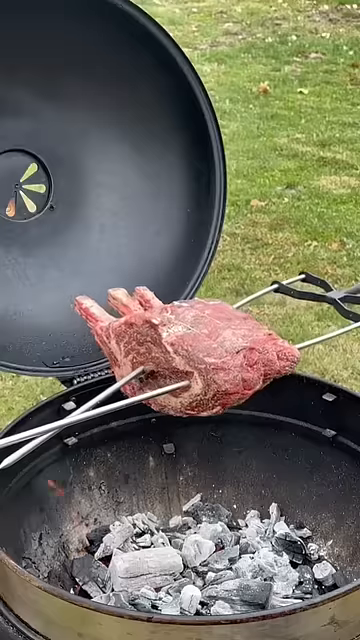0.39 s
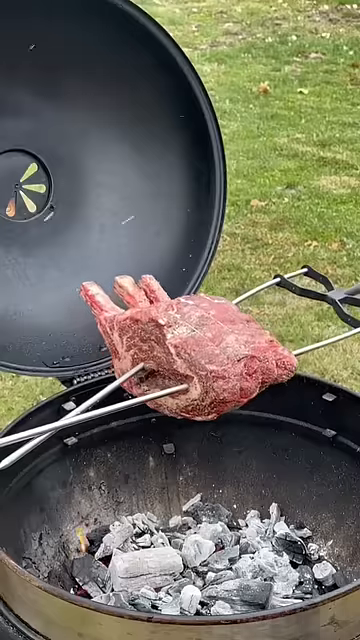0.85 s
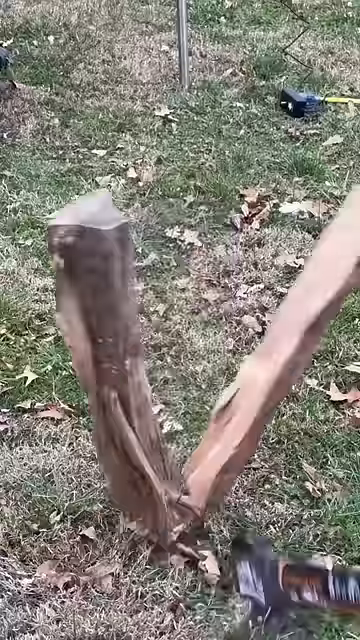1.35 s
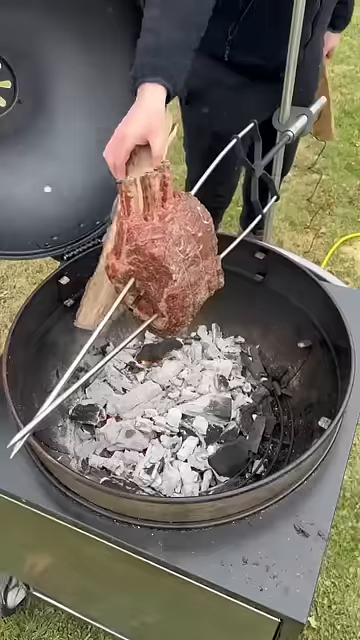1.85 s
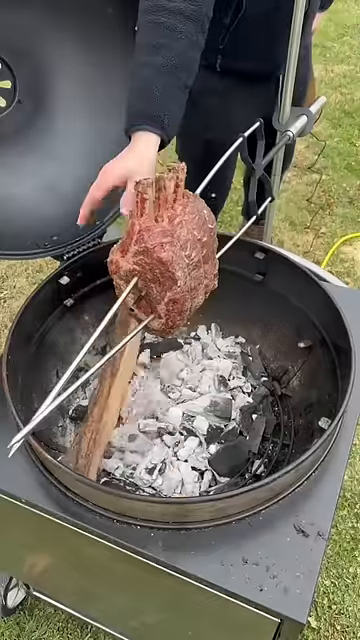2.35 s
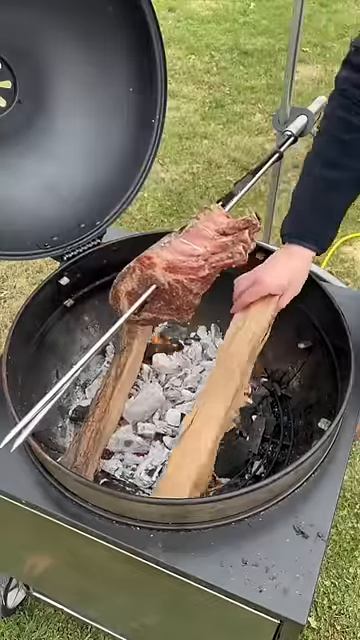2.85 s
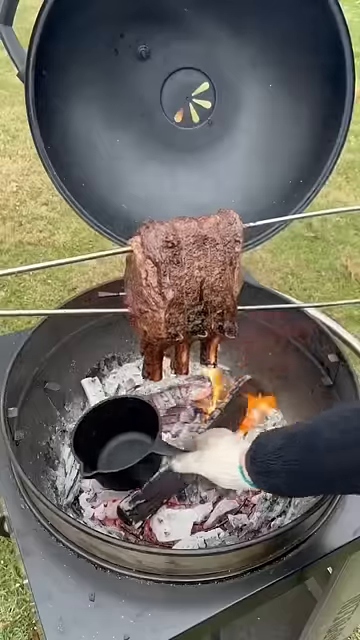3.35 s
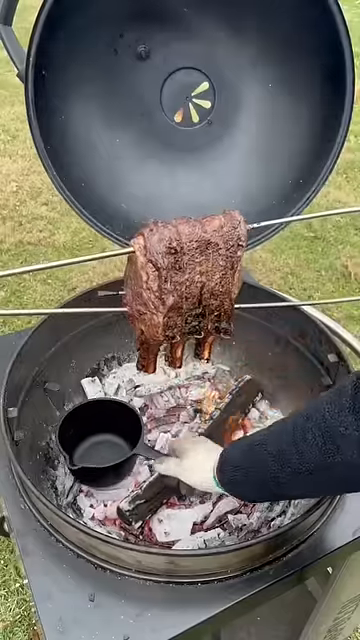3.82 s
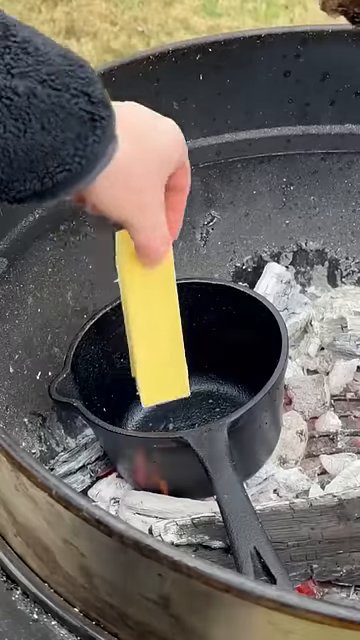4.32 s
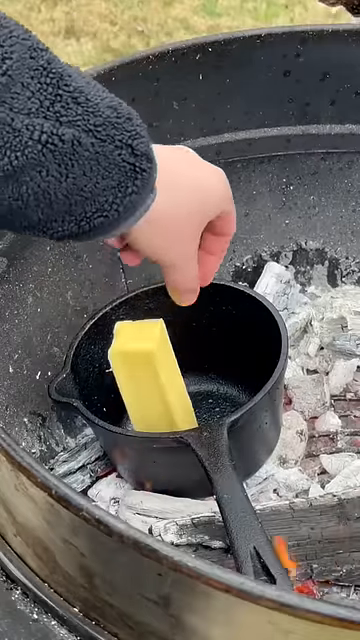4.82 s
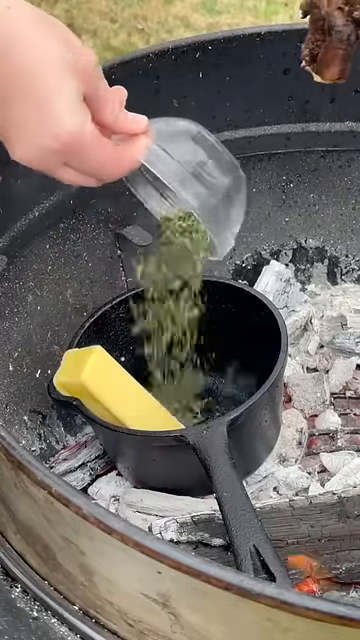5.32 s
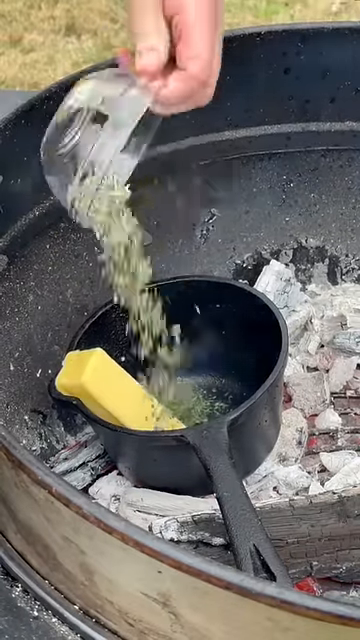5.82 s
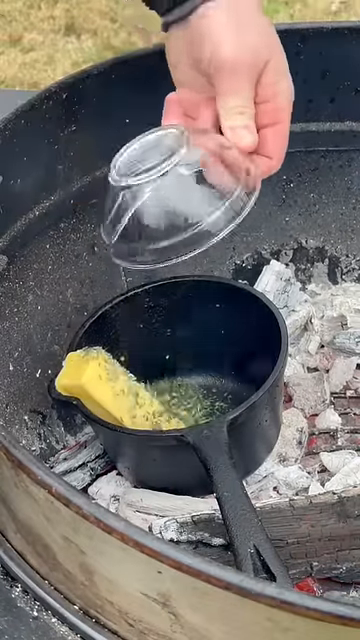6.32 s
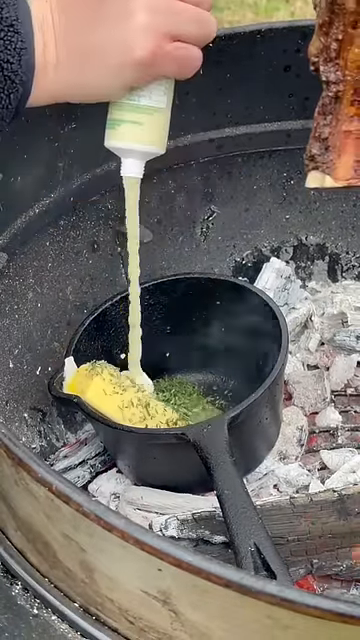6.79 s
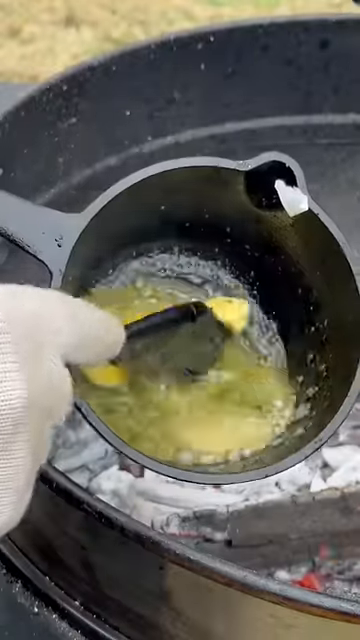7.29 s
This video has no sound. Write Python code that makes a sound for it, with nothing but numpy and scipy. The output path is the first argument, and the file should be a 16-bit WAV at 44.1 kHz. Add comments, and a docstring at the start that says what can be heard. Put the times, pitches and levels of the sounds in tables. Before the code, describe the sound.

A close, dry outdoor phone pickup with low wind and soft yard noise, in abruptly cut scenes. From 0.1 to 1.0 s a faint, narrow, noisy motor whine runs, with a crisp tick near 0.76. Fine leafy rustle follows; at 1.3 an axe splits wood with a very short, falling crack, and a small wood knock lands at 1.65. Muffled flame flutter begins at 1.8. At 2.25-2.35 a log thuds in rapid hollow knocks with crunching charcoal and brief squeaks; another hits at 2.79, then clatters brightly at 3.05. The motor whirs from 3.24 to 5.0, with a wind bump at 3.29. Iron scrapes in gritty, ringing jerks from 3.53 to 4.11, growing stronger. From 5.0 butter sizzles, with sharp pops clustering at 5.65 and 6.0-6.15, a low wind bump at 5.9, and more spits until 7.0. A quieter, fizzy sizzle closes by 7.4.

```python
"""Butter sizzles and spits in an iron pot: noise bursts stand for bubbles, sharp clicks for fat and embers.
Before it, in short outdoor scenes cut together around a charcoal kettle grill, a spit motor whines in narrow
noisy bands, an axe splits a log with a falling sweep, the halves thud on the grass and later logs thud on the
coals as ringing wood modes, and the pot scrapes into the charcoal as ringing grit. Shaped noise makes the wind,
yard, flames and rustle. A phone picks it all up through two ports that fall out of phase in the treble."""
import sys
import numpy as np
from scipy import signal
from scipy.fft import rfft, irfft, next_fast_len
from scipy.io import wavfile

SR = 44100
rng = np.random.default_rng(int(sys.argv[2]) if len(sys.argv) > 2 else 0)


def magnitude_from_level(level_db):
    """Linear magnitude for a level in decibels (20 dB per decade)."""
    exponent = np.asarray(level_db, float) / 20
    return 10 ** exponent


def to_wav(s):
    """Save 16-bit WAV."""
    ch = np.atleast_2d(s).T  # columns
    pcm = np.round(np.clip(ch, -1, 1) * 32767)  # PCM
    wavfile.write(sys.argv[1], SR, pcm.astype(np.int16))


N = 327222
TIME = np.arange(N) / SR  # seconds

# tone colour of each background noise: pitch_hz, gain_db
WIND_COLOUR = [(20, -9), (45, 1.5), (90, 1), (130, -4.5), (190, -12.5), (400, -48.5)]
YARD_COLOUR = [(120, -8), (200, 4.5), (300, 2), (600, -3), (900, -4), (1400, -11.5), (2400, -32),
               (5000, -52), (16000, -28)]
FLAME_COLOUR = [(100, -0.5), (200, -1), (400, 2), (560, -6.5), (700, -3.5), (1100, -15), (1500, -27.5),
                (2200, -40), (16000, -64)]
RUSTLE_COLOUR = [(2000, -36), (4000, -3.5), (6000, 0), (8500, 0.5), (11000, 1), (13500, -12), (15500, -2.5)]
# steady background, each row held until the next, -99 is as good as silent:
# start_s, wind_db, yard_db, flames_db, bright_hiss_db, dull_hiss_db
STRETCHES = [(0, -51.5, -61, -99, -99, -99), (.1, -49.5, -58, -99, -104, -65),
             (1, -50, -59, -99, -60.5, -64), (1.41, -61, -68, -99, -71, -64.5),
             (1.659, -53.5, -60.5, -99, -57, -62.5), (1.809, -57, -99, -47, -65, -66),
             (2.241, -53, -99, -38, -99, -99), (2.52, -43.5, -99, -42, -88.5, -81),
             (2.78, -45, -99, -37.5, -99, -99), (3.209, -41.5, -54, -99, -70, -64.5),
             (3.45, -51.5, -54.5, -99, -69, -66.5), (4.12, -44, -57, -99, -63, -64.5),
             (5, -53.5, -62, -99, -99, -99), (5.67, -45, -57, -99, -99, -99),
             (6.45, -48.5, -60.5, -99, -99, -99), (7.1, -47.5, -55.5, -99, -99, -99)]
GUSTS_PER_S, GUST_SPREAD_DB = 9, 4.5
# puffs of air on the ports, some pushed by the falling wood: peak_s, level_db, fall_s
PUFFS = [(1.04, -54, 0.076), (1.314, -42, 0.048), (1.658, -39, 0.033), (1.884, -34.5, 0.019),
         (2.03, -42, 0.021), (2.345, -32, 0.12), (2.79, -40, .06), (3.07, -42, 0.15), (2.65, -47, 0.045),
         (6.37, -49, 0.032)]
PUFF_RISE_S = 0.026
# gusts that knock the microphone: start_s, level_db, pitch_hz
KNOCKS = [(3.287, -27.5, 105), (5.903, -24.5, 73.6)]
# leaves and embers swelling up: peak_s, rise_s, fall_s, bright_db, dull_db
SWELLS = [(.62, 0.23, 0.093, -52, -59), (1.09, 0.086, 0.005, -46.5, -55.5), (2.07, 0.3, 0.097, -65, -62)]

# gear whine of the spit motor: start_s, end_s, level_db
WHINE = [(0.102, 1.002, -60), (2.513, 2.78, -71), (3.242, 4.118, -58), (4.097, 5.013, -60.5)]
# bands of each whine, one list per row above: pitch_hz, width_hz, relative_level_db
WHINE_BANDS = [
    [(3350, 100, 7), (3630, 82, 6), (4800, 100, -8), (5460, 130, -20), (6400, 160, 0), (7750, 130, -1),
     (9390, 110, -20)],
    [(3900, 150, -1), (4800, 200, 3), (6500, 200, 3), (7900, 150, -8.5)],
    [(3460, 66, -10), (4310, 38, -4.5), (6010, 180, -9), (7560, 260, 6.5), (8440, 72, -6), (9000, 110, -17)],
    [(2600, 160, 8), (4910, 62, -9), (6940, 31, 2.5), (7550, 75, 8.5), (7840, 72, -4), (8600, 180, -19),
     (9000, 31, -13)],
]
# brief noisy tones as wood splits and rubs, and one in the fat: start_s, length_s, pitch_hz, level_db
SQUEAKS = [(1.311, 0.043, 980, -34), (1.312, .02, 2200, -38), (1.346, 0.06, 1980, -45),
           (1.397, 0.12, 2000, -59), (1.867, 0.28, 2090, -56), (2.392, 0.091, 1600, -38),
           (2.457, 0.07, 1446, -36), (2.787, 0.041, 2900, -40), (2.817, 0.087, 1480, -38),
           (3.042, 0.026, 2750, -23), (3.076, 0.025, 3580, -27.5), (3.098, 0.049, 2990, -29),
           (3.138, .083, 1500, -34), (5.536, 0.021, 1810, -37.5)]
SQUEAK_WIDTH_HZ = 180

# the iron pot jerks forward through the coals: start_s, level_db
DRAG = [(3.534, -57.5), (3.591, -53.5), (3.695, -49.5), (3.733, -50), (3.79, -66), (3.861, -48.5),
        (3.897, -47.5), (3.973, -44.5), (4.039, -43), (4.079, -49.5)]
DRAG_END_S, SLIP_FADE_S = 4.113, 0.062  # the pot is let go at the end
# tone colour of the scraping: pitch_hz, gain_db
DRAG_COLOUR = [(150, -3), (300, 2.5), (600, -5), (1200, -2.5), (2400, -12), (4000, -11), (6000, -19.5),
               (8500, -15), (11000, -15), (13500, -27), (15500, -18)]
# resonances of the pot wall: pitch_hz, width_hz, relative_level_db
POT_MODES = [(588, 35, -1.5), (1537, 52, -3.5), (1950, 62, -2.5), (2190, 24, 1), (2650, 42, -7),
             (4040, 42, -6), (4440, 36, -14), (5180, 35, 2), (6180, 72, -1), (6630, 42, 0),
             (7360, 200, -33)]

# charcoal and splinters cracking under a log: peak_s, level_db, fade_s, dust_db (bright dust against the crack)
CRUNCH = [(1.298, -39, 0.0045, -13), (1.321, -41, .006, -5), (1.354, -42.5, 0.017, -11),
          (2.245, -30, 0.051, -16.5), (2.303, -27.5, 0.037, -9.5), (2.316, -20, 0.01, -14),
          (2.369, -36, 0.18, -8), (2.783, -31, 0.016, -12.5), (2.825, -44, 0.096, -11.5),
          (2.975, -57.5, 0.046, 5), (3.013, -35.5, 0.0061, -9), (3.035, -26, 0.011, 2),
          (3.0448, -20.5, 0.027, -19), (3.108, -29.5, 0.035, -19)]
CRACK_RISE_S, RUMBLE_DB = 0.0019, -15
# a crack still sounding at one of these moments is cut off: end_s
CRUNCH_CUTS_S = [2.515, 2.998, 3.21]
# tone colour of the cracking: pitch_hz, gain_db
CRUNCH_COLOUR = [(800, 0.5), (1100, 1), (2400, -2), (4000, -10), (6000, -26.5)]
# resonances of the steel kettle: pitch_hz, width_hz, relative_level_db
KETTLE_MODES = [(1490, 20, -10.5), (1867, 26, 2.5), (2710, 86, -4), (2920, 77, 1.5), (3480, 29, 4),
                (4200, 19, 6)]
# stretch in which the kettle scatters sound back: start_s, end_s
KETTLE_SCENES_S = (1.81, 4.115)
NEARBY_DB, NEARBY_FADE_S = -14, 0.0039

# pushes that set the logs ringing, several close together within one thud: start_s, strength_db, contact_ms
THUDS = [(1.317, -29.5, 3.8), (1.329, -38, 5.1), (1.647, -29, 0.88), (2.25, -11, 2.1), (2.2582, -10, 1.56),
         (2.306, -8, 3.4), (2.318, -7, 1.8), (2.333, -9.5, 2.2), (2.7907, -6, 4.3), (2.797, -11.5, 4.8),
         (3.046, -10.5, 1.7), (3.0502, -12.5, 2.4), (3.06, -18, 2.1), (3.08, -14, 1.6)]
# ringing of a log: pitch_hz, level_db, t60_s (time to fade by 60 dB)
LOG_MODES = [(137.6, -5.5, .06), (178, -8.5, 0.062), (224, 0, 0.064), (290, -6.5, 0.048),
             (445, -7.5, 0.022), (539, -7.5, 0.033), (930, -9, 0.05), (2030, -19, .03), (2750, -19, .04)]
AXE_S, AXE_DB = 1.3052, -2.5

# butter frying, one list a scene: time_s, level_db, cavity_level_db, fizz_db (added to level_db)
SIZZLE = [
    [(5.005, -41.5, -64, 1), (5.06, -40.5, -65, -3.5), (5.3, -39, -55, 0.5), (5.66, -47.5, -55.5, 2.5)],
    [(5.66, -48, -55.5, -1.5), (6.4, -49, -54.5, 2)],
    [(6.4, -47.5, -58, 6.5), (7.1, -48, -53.5, 2)],
    [(7.1, -53, -69, 4), (7.42, -53.5, -63, 9.5)],
]
# tone colour of the crackle and of the fizz: pitch_hz, gain_db
SIZZLE_COLOUR = [(900, -40), (1400, -54), (1680, 3.5), (1880, -0.5), (2060, 1.5), (2550, -2.5), (2850, 1.5),
                 (3300, 0), (3800, 2), (4400, 0), (6000, -3.5), (8000, 1.5), (10000, -23)]
FIZZ_COLOUR = [(5000, -11.5), (7000, -6.5), (8500, 0), (11000, -1), (13500, -3), (15800, -1)]
CAVITY_HZ, CAVITY_WIDTH_HZ = 791, 168  # air in the pot; the width is that of a single pass
# embers and splinters snapping, water bursting out of the fat:
# start_s, peak_db, hollow_ring_db, treble_click_db (before its filter), pitch_hz
POPS = [(.1424, -40.5, -60, -37, 6000), (.347, -44, -65, -50, 4770), (.904, -47, -55, -50, 4900),
        (0.7647, -18.5, -54, -51, 6030), (1.5354, -36, -48, -30.5, 1600),
        (1.6425, -24.5, -37.5, -23.5, 2740), (1.6666, -29.5, -48, -42, 2350),
        (2.3034, -12.5, -40, -8.5, 1610), (2.7202, -46, -51, -35, 5000), (2.757, -51, -49, -55, 1500),
        (2.7827, -30, -35, -27, 3100), (2.8494, -35, -41, -16, 1500), (3.0335, -22, -40, -6, 5000),
        (3.59, -44, -53, -45, 2600), (3.8596, -37, -54, -27, 1550), (4.378, -38, -67, -50, 5700),
        (4.5605, -41, -63, -35, 2180), (4.5832, -39.5, -69, -32, 2620), (4.9367, -41, -44, -45, 1500),
        (5.0094, -34, -61, -26, 4050), (5.1639, -19.5, -61, -37, 3860), (5.1896, -25.5, -51, -41, 1810),
        (5.2494, -37, -56, -33, 2010), (5.3044, -26, -43, -41, 2000), (5.3769, -33, -56, -33, 1760),
        (5.438, -23, -49, -11.5, 2920), (5.6309, -15, -58, -10.5, 5060), (5.6495, -10, -29, -6, 4800),
        (5.9833, -19, -39, -9.5, 3740), (5.9924, -17.5, -34.5, -20, 4310), (6.0117, -20, -39, -36, 6410),
        (6.0204, -26, -44, -32, 2010), (6.0547, -10, -27.5, -17, 4000), (6.0744, -25.5, -35, -25, 1930),
        (6.137, -17.5, -29, -27, 2550), (6.2233, -32, -23.5, -39, 1700), (6.3235, -28, -39, -37, 2620),
        (6.4562, -20.5, -42, -12.5, 6010), (6.4888, -27, -49, -20, 3460), (6.5274, -37.5, -56, -13, 2360),
        (6.576, -20.5, -43, -53, 1830), (6.7085, -15, -41, -24, 4300), (6.9214, -28, -63, -22, 5000),
        (6.9484, -16.5, -38, -14, 3570), (6.9696, -21.5, -42, -34, 6460), (6.9806, -26.5, -50, -36, 4000),
        (7.01, -33, -44, -35, 2280)]
SNAP_S, SPRAY_S = 0.00036, 0.0058  # fade times of a pop and of its tail
# small spits at random moments while the butter fries; ring and treble are relative to the spit
SPITS_PER_S, SPIT_DB, SPIT_SPREAD_DB, SPIT_RING_DB, SPIT_TREBLE_DB = 13.5, -33.5, 1, -19.5, -4

# phase gap between the ports: pitch_hz, left_lead_radians
PORT_PHASE = [(0, 0), (200, .1), (450, .6), (800, .6), (1500, .04), (5400, .04), (6600, 1), (8700, 1.9),
              (10000, 2.75), (10800, 3.08), (13500, 3.2), (14200, 3.7), (15600, 4.5)]
TOP_HZ = 15900


def colour(x, table):
    """Shapes a sound by points of pitch and gain, joined on a logarithmic pitch scale."""
    hz, db = np.transpose(table)
    size = next_fast_len(x.shape[-1])
    log_hz = np.log(np.arange(size // 2 + 1) * SR / size + 1)  # + 1 avoids the log of zero
    shape = magnitude_from_level(np.interp(log_hz, np.log(hz), db))
    return irfft(rfft(x, size) * shape, size)[..., :x.shape[-1]]


def band(x, low_hz, high_hz):
    """Four-pole band-pass."""
    return signal.sosfilt(signal.butter(2, [low_hz, high_hz], "band", fs=SR, output="sos"), x)


def ring(x, hz, width_hz):
    """One resonance, gain 1 at its centre."""
    return signal.lfilter(*signal.iirpeak(hz, hz / width_hz, SR), x)


def unit(x, low_hz, high_hz):
    """Scales a sound to rms 1 within a band."""
    return x / np.std(band(x, low_hz, high_hz))


def gain(tables, *columns):
    """Gain over time from the summed dB columns of each scene; silent outside them."""
    out = np.zeros(N)
    for rows in map(np.array, tables):
        on = (TIME >= rows[0, 0]) & (TIME < rows[-1, 0])
        db = rows[:, columns].sum(axis=1)
        out[on] = magnitude_from_level(np.interp(TIME[on], rows[:, 0], db))
    return out


def held(column):
    """Gain over time from one column of the stretch table."""
    rows = np.array(STRETCHES)
    current = np.searchsorted(rows[:, 0], TIME, "right") - 1
    return magnitude_from_level(rows[current, column])


def swell(s, db, rise_s, fall_s):
    """An exponential rise to a peak and an exponential fall."""
    out = np.zeros(N)
    on = slice(max(int((s - 10 * rise_s) * SR), 0), int((s + 10 * fall_s) * SR))
    t = TIME[on] - s
    out[on] = magnitude_from_level(db) * np.exp(np.where(t < 0, t / rise_s, -t / fall_s))
    return out


def walk(rate):
    """Slow chance: random levels, this many a second, joined by straight lines."""
    steps = rng.standard_normal(200)
    return np.interp(TIME * rate, np.arange(len(steps)), steps)


def grains(rate, spread_db, length_ms, share):
    """Noise with short bursts on top: random moments, a few far louder than the rest."""
    starts = rng.random(N) < rate / SR
    size = starts * magnitude_from_level(np.minimum(spread_db * rng.exponential(size=N), 24))
    bursts = signal.lfilter([1], [1, -np.exp(-1000 / (length_ms * SR))], size)
    return rng.standard_normal(N) * (1 + share * bursts)


def wide(table, side_db):
    """Diffuse noise: a common part and, in the low range, a part opposite in the two channels."""
    mid, side = colour(rng.standard_normal((2, N)), table)
    side = band(side, 30, 1500)
    return mid + magnitude_from_level(side_db) * np.array([side, -side])


def wind():
    """Low noise of moving air, swaying in gusts, with single puffs on top."""
    gusts = held(column=1) * magnitude_from_level(GUST_SPREAD_DB * walk(GUSTS_PER_S))
    puffs = sum(swell(s, db, PUFF_RISE_S, fall) for s, db, fall in PUFFS)
    return (gusts + puffs) * unit(wide(WIND_COLOUR, -26), 29.2, 137)


def yard():
    """Soft outdoor noise from all around, wavering slightly."""
    return held(column=2) * magnitude_from_level(1.03 * walk(4.6)) * unit(wide(YARD_COLOUR, -8), 162, 1000)


def flames():
    """Muffled fire noise that flutters in level."""
    return held(column=3) * magnitude_from_level(2.1 * walk(12)) * unit(wide(FLAME_COLOUR, -8), 327, 750)


def knocks():
    """A gust pushes the microphone through a couple of low, quickly fading cycles."""
    out = np.zeros(N)
    for s, db, hz in KNOCKS:
        cycles = np.maximum(TIME - s, 0) * hz
        out += magnitude_from_level(db) * 3 * cycles * np.exp(1 - cycles * 2.2) * np.sin(2 * np.pi * cycles)
    return out


def rustle():
    """Fine bright ticks over a hiss, with a duller layer of the same ticks."""
    ticks = grains(150, 4.3, 1.0, 0.29)
    flicker = magnitude_from_level(3 * walk(8))
    bright = held(column=4) * flicker + sum(swell(s, db, rise, fall) for s, rise, fall, db, _ in SWELLS)
    dull = held(column=5) + sum(swell(s, db, rise, fall) for s, rise, fall, _, db in SWELLS)
    bright_ticks = unit(colour(ticks, RUSTLE_COLOUR), 2900, 8000)
    dull_ticks = unit(band(ticks, 720, 3560), 970, 5500)
    return bright * bright_ticks + dull * dull_ticks


def motor():
    """Narrow noisy bands from meshing gears; each band wavers on its own as the load turns."""
    out, noise = np.zeros(N), rng.standard_normal(N)
    for (start, end, db), bands in zip(WHINE, WHINE_BANDS):
        on = (TIME >= start) & (TIME < end)
        whine = 0
        for hz, width, band_db in bands:
            steps = rng.standard_normal(14)
            waver = magnitude_from_level(1.8 * np.interp(TIME[on], np.linspace(start, end, len(steps)), steps))
            # dividing by the root of the width gives wide and narrow bands a like loudness
            whine = whine + magnitude_from_level(band_db) * waver * ring(noise[on], hz, width) / np.sqrt(width)
        out[on] = magnitude_from_level(db) * whine / whine.std()
    return out


def squeaks():
    """Rubbing noise held for a moment in a single resonance."""
    out, noise = np.zeros(N), rng.standard_normal(N)
    for s, length, hz, db in SQUEAKS:
        k = np.arange(int(length * SR))
        at = int(s * SR) + k
        tone = ring(noise[at], hz, SQUEAK_WIDTH_HZ)
        fade = np.sin(np.pi * (k / len(k)) ** 0.3)  # quick rise, slow fall
        out[at] += magnitude_from_level(db) * fade * tone / tone.std()
    return out


def pot():
    """Cast iron scraping over coal: each slip starts at once and fades, and the grit sets the pot wall ringing."""
    slips = sum(swell(s, db, 0.0022, SLIP_FADE_S) for s, db in DRAG)
    grit = grains(900, 2.2, 0.78, 0.14)
    iron = sum(magnitude_from_level(db) * ring(grit, hz, width) for hz, width, db in POT_MODES)
    scrape = unit(colour(grit + magnitude_from_level(11.5) * iron, DRAG_COLOUR), 760, 6100)
    return slips * (TIME < DRAG_END_S) * scrape


def charcoal():
    """Brittle lumps grind and crack; the steel kettle rings briefly with them and rumbles below."""
    grit = grains(500, 3.36, 3.7, 0.28)
    steel = sum(magnitude_from_level(db) * ring(grit, hz, width) for hz, width, db in KETTLE_MODES)
    ends = np.array(CRUNCH_CUTS_S)
    cracks = [swell(s, db, CRACK_RISE_S, fade) * (TIME < ends[ends > s][0]) for s, db, fade, _ in CRUNCH]
    dust = sum(magnitude_from_level(row[3]) * crack for row, crack in zip(CRUNCH, cracks))
    body = unit(colour(grit + magnitude_from_level(0.5) * steel, CRUNCH_COLOUR), 900, 5000)
    rumble = magnitude_from_level(RUMBLE_DB) * unit(band(grit, 310, 1770), 600, 1800)
    return sum(cracks) * (body + rumble) + dust * unit(band(grit, 3700, 12700), 4700, 8900)


def logs():
    """A half-sine push rings the wood modes; a softer contact lasts longer and sounds duller."""
    push = np.zeros(N)
    for s, db, ms in THUDS:
        k = np.arange(int(ms * SR / 1000))
        push[int(s * SR) + k] += magnitude_from_level(db) * np.sin(np.pi * k / len(k)) * 2 / len(k)
    t = TIME[:SR // 4]
    body = 0
    for hz, db, t60 in LOG_MODES:
        body = body + magnitude_from_level(db) * np.sin(2 * np.pi * hz * t) * np.exp(-np.log(1000) * t / t60)
    return band(signal.fftconvolve(push, body)[:N], 165, 9000)  # the thuds carry no deep bass


def axe():
    """The crack runs down the grain: high bending waves arrive first, so it sweeps down in five milliseconds."""
    t = np.maximum(TIME - AXE_S, 0)
    cycles = 430 * t + 9.503 * (1 - np.exp(-t / 0.0014))  # falls toward 430 Hz
    shape = (t / 0.0027) ** 2 * np.exp(2 - 2 * t / 0.0024) * np.exp(-(t / 0.006) ** 3)
    snap = 0.5 * band(rng.standard_normal(N), 2400, 10500) * (t / 0.00055) * np.exp(-t / 0.0013)
    return magnitude_from_level(AXE_DB) * (shape * np.sin(2 * np.pi * cycles) + snap)


def cavity(x):
    """A hollow resonance, as of the air in the pot; two passes sharpen the peak."""
    once = ring(x, CAVITY_HZ, CAVITY_WIDTH_HZ)
    return ring(once, CAVITY_HZ, CAVITY_WIDTH_HZ)


def spits():
    """Rows like those of POPS, drawn by chance, crowded toward the start of the frying."""
    start, end = SIZZLE[0][0][0], SIZZLE[-1][-1][0] - 0.05
    chance = rng.random((100, 3))[:int(SPITS_PER_S * (end - start))]
    s = start + (end - start) * chance[:, 0] ** 2.2
    db = SPIT_DB - SPIT_SPREAD_DB * np.log(1 - 0.95 * chance[:, 1])
    hz = 1700 * 3.1 ** chance[:, 2]
    return list(zip(s, db, db + SPIT_RING_DB, db + SPIT_TREBLE_DB, hz))


def pops():
    """Sharp clicks with a noisy tail, strongest around their own pitch, with a short hollow ring near 790 Hz below."""
    length = 1500  # samples
    body, treble, hollow = np.zeros((3, N + length))
    t = np.arange(length) / SR
    impulse = 1.0 * (t == 0)
    hollow_ring = cavity(impulse) + 0.13 * ring(impulse, 1950, 410)
    fade = (1 - np.exp(-t / 0.00033)) * (np.exp(-t / SNAP_S) + 0.11 * np.exp(-t / SPRAY_S))
    for s, db, hollow_db, treble_db, hz in POPS + spits():
        at = slice(int(s * SR), int(s * SR) + length)
        burst = rng.standard_normal(length) * fade
        burst = burst / np.abs(burst).max()
        burst[4] += 1.5  # the skin snaps
        click = band(0.42 * burst + 0.95 * ring(burst, hz, 0.69 * hz), 1260, 9300)
        hollow[at] += magnitude_from_level(hollow_db) * hollow_ring / np.abs(hollow_ring).max()
        body[at] += magnitude_from_level(db) * click / np.abs(click).max()
        treble[at] += magnitude_from_level(treble_db) * burst
    return (hollow + body + band(treble, 4660, 18400))[:N]


def butter():
    """Bubbles burst at a pitch set by their size: large ones stir the pot cavity, the smallest fizz on top."""
    large, medium = grains(160, 2.94, 1.0, 0.88), grains(220, 2.94, 0.66, 0.88)
    small, tiny = grains(280, 2.94, 0.44, 0.88), grains(300, 2.94, 0.58, 0.88)
    sizes = band(large, 1600, 2900) + band(medium, 2890, 4700) + band(small, 4600, 7440) + 0.5 * large
    crackle = gain(SIZZLE, 1) * magnitude_from_level(0.91 * walk(22)) * unit(colour(sizes, SIZZLE_COLOUR), 1300, 7900)
    fine = unit(colour(tiny + 0.53 * small, FIZZ_COLOUR), 6600, 13700)
    fizz = gain(SIZZLE, 1, 3) * magnitude_from_level(2.5 * walk(13)) * fine
    hollow = gain(SIZZLE, 2) * magnitude_from_level(2.5 * walk(15)) * unit(cavity(large), 650, 950)
    return crackle + fizz + hollow


def nearby(x):
    """Close to the kettle, bowl and lid scatter sound back, unlike at the two ports."""
    t = TIME[:2000]
    echoes = rng.standard_normal((2, len(t))) * np.exp(-t / NEARBY_FADE_S)
    echoes = magnitude_from_level(NEARBY_DB) * echoes / np.sqrt(np.sum(echoes ** 2, axis=1, keepdims=True))
    start, end = KETTLE_SCENES_S
    heard = band(x * (TIME > start) * (TIME < end), 400, 5500)
    return signal.fftconvolve(heard[None], echoes, axes=1)[:, :N]


def ports(x):
    """Sound reaches the two ports with a phase gap that is widest in the treble."""
    hz, lead = np.transpose(PORT_PHASE)
    size = next_fast_len(N)
    # half of the gap forward at the left port, half back at the right
    turn = np.exp(0.5j * np.interp(np.arange(size // 2 + 1) * SR / size, hz, lead))
    return irfft(rfft(x, size) * np.array([turn, turn.conj()]), size)[:, :N]


def scene():
    """All sources pass through the port pair; a weak share of the pops also arrives in phase at both."""
    surroundings = wind() + yard() + flames()
    bursts = pops()
    near = knocks() + rustle() + motor() + squeaks() + pot() + charcoal() + logs() + axe() + bursts + butter()
    square_on = magnitude_from_level(-10) * band(bursts, 9400, 10700)
    return ports(near + nearby(near) + surroundings) + square_on


def low_pass(x):
    """Removes everything above the highest recorded frequency."""
    return signal.sosfilt(signal.butter(12, 17510, fs=SR, output="sos"), x)


def record(dry):
    """The phone cuts the deepest bass and the top."""
    bass_cut = signal.butter(2, 45, "high", fs=SR, output="sos")
    top_cut = signal.ellip(8, 0.2, 36, TOP_HZ, fs=SR, output="sos")
    mix = signal.sosfilt(top_cut, signal.sosfilt(bass_cut, dry))
    return low_pass(mix)


dry = scene()
out = record(dry)
to_wav(out)
```